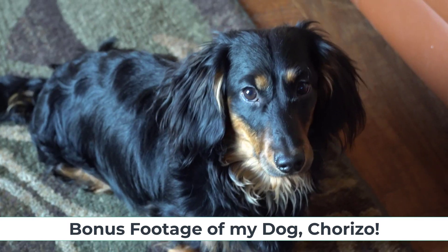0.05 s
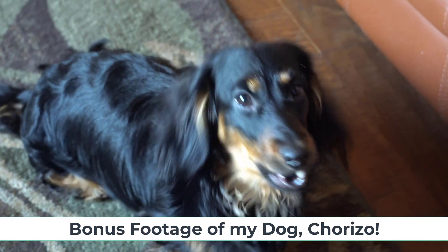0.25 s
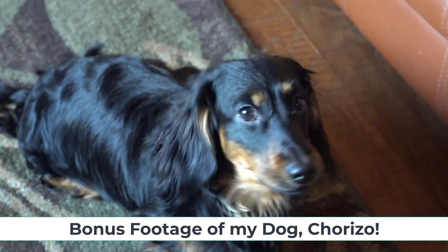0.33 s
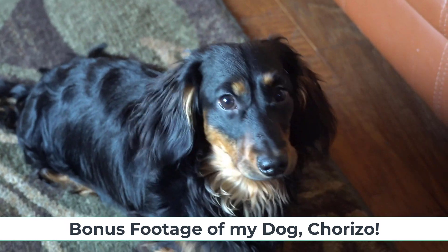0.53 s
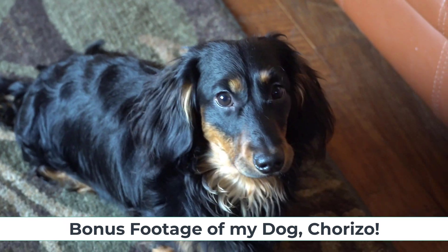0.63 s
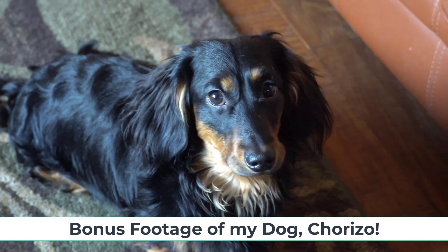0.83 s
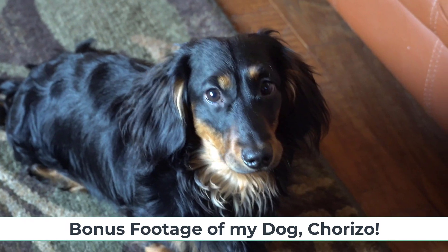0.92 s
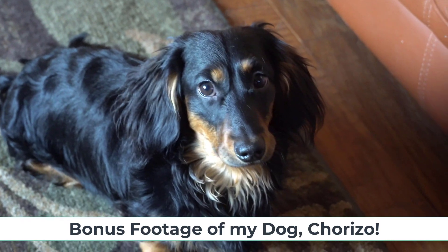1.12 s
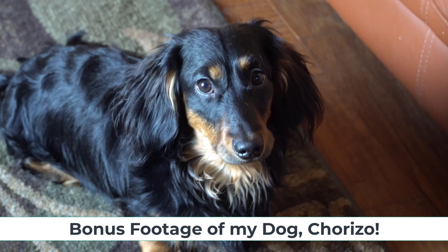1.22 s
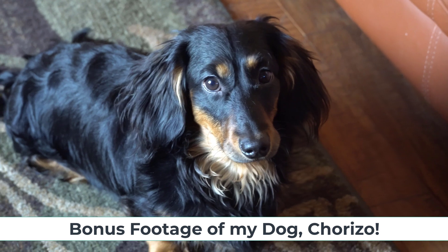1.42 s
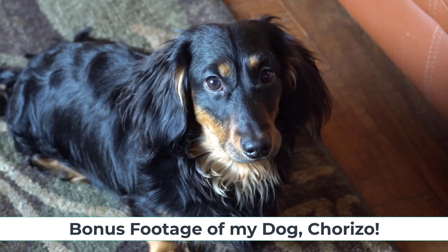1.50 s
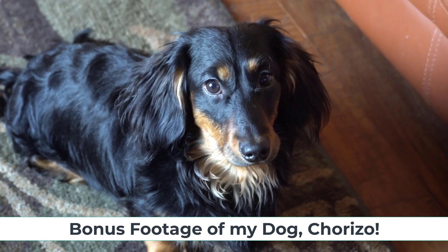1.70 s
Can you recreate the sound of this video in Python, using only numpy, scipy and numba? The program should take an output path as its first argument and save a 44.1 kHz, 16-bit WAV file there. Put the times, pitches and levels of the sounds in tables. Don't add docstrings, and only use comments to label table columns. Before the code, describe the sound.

Single abrupt, high bark from a small dog indoors, its pitch ringing briefly off hard walls.

```python
import sys
import numpy as np
from scipy import signal
from scipy.fft import rfft, irfft
from scipy.io import wavfile
from scipy.ndimage import uniform_filter1d
from numba import njit

SR = 44100
rng = np.random.default_rng(int(sys.argv[2]) if len(sys.argv) > 2 else 0)


def field_ratio(decibels):
    return 10 ** (np.asarray(decibels, dtype=float) / 20)


def wav_record(signal):
    frames = np.transpose(np.atleast_2d(signal))
    bounded = np.clip(frames, -1, 1)
    quanta = np.round(bounded * 32767).astype(np.int16)
    wavfile.write(sys.argv[1], SR, quanta)


N = 77175

# start_s, pitch_hz, level_db, odd_multiples_db, breath_db, jaw_opening (0-1)
BARK_COURSE = [
    (0.131, 105.2, -71, -0.5, -14.5, 0.02),
    (0.161, 115.7, -41.5, -2, -19, 0),
    (.205, 190, -25, 0, -17, .14),
    (.222, 266, -8, -3, -21, .5),
    (.252, 340, 2, -9, -23, .55),
    (0.277, 369.2, 2.5, -31.5, -29, 1.),
    (.318, 365.5, 1, -30, -33.5, 0.9),
    (0.345, 336.8, -2.5, -36.5, -31.5, 1),
    (0.371, 329, -50.5, -26.5, -30.5, 0.9),
]
# frequency_hz, level_db
JAWS_SHUT = [(100, 1.5), (220, 0.5), (450, -7.5), (800, -15), (1050, -28.5), (1250, -28.5), (1700, -35),
             (5000, -53)]
# frequency_hz, level_db
JAWS_HALF = [(250, -18), (480, -3), (800, 0), (1300, -21), (2350, -21), (3200, -26), (4000, -46),
             (9000, -54)]
# frequency_hz, level_db
JAWS_OPEN = [(300, -24), (730, 4), (1400, -8.5), (2200, -11), (3600, -26.5), (4400, -23.5), (5200, -44),
             (9000, -53)]
# frequency_hz, level_db
ODD_COLOUR = [(250, -4), (380, -2), (900, 2), (1650, 6), (2350, 12), (3200, 4), (4700, 8), (9000, 2)]
# frequency_hz, level_db
BREATH_OPEN = [(300, -7), (2300, -15.5), (3300, -11.5), (4500, -11), (5700, -23.5), (7800, -1),
               (9800, -5.5), (15000, -36)]
# frequency_hz, level_db
BREATH_SHUT = [(600, -29), (1900, -20), (2800, -3), (3700, -21), (4600, 0.5), (6000, -12), (8000, -4),
               (10500, -7), (12500, -37)]
# frequency_hz, level_db
PUFF_COLOUR = [(20, -3), (40, 0), (90, -9), (200, -12), (380, -16), (600, -50)]
# frequency_hz, level_db, t60_s
ROOM_DECAY = [(148.5, -14, 0.45), (400, 0, 0.27), (757.7, -3, 0.54), (1400, 6, 0.51), (2200, 4.5, 0.45),
              (4300, -0.5, 0.39), (8000, -11, 0.78), (14000, -16.5, 0.22)]
# start_s, pitch_hz, peak_db, t60_s
IMPACTS = [
    (.0218, 840, -46.5, .012),
    (.094, 89, -62.5, 0.18),
    (.955, 98.45, -51.5, .15),
    (1.388, 644, -60.5, .03),
    (1.53, 105.3, -53.5, .15),
]
# frequency_hz, density_db (dB per Hz)
BACKGROUND = [(20, -6), (60, -3.5), (190, -2.5), (450, -8.5), (780, -9.5), (1300, -20), (3000, -25),
              (15000, -29)]

TOP_HZ = 15300
DUCK_DB, DUCK_AT_S, RECOVER_S = -4.5, 0.2, 8.0


def read(table, hz, col=1):
    a = np.array(table, float)
    return np.interp(np.log(np.maximum(hz, 1)), np.log(a[:, 0]), a[:, col])


def noise(table):
    gain = field_ratio(read(table, np.fft.rfftfreq(N, 1 / SR)))
    x = irfft(rfft(rng.standard_normal(N)) * gain, N)
    return x / x.std()


def walk(rate):
    k = int(SR / rate)
    held = np.repeat(rng.standard_normal(N // k + 1), k)
    return 1.5 * uniform_filter1d(uniform_filter1d(held, k), k)[:N]


def bands(count=20):
    half_octaves = np.log2(np.maximum(np.fft.rfftfreq(N, 1 / SR), 1) / 25) * 2
    spec = rfft(rng.standard_normal(N))
    return [(25 * 2 ** (k / 2), irfft(spec * np.clip(1 - abs(half_octaves - k), 0, 1), N))
            for k in range(count)]


@njit
def follow(x, up, down):
    e, y = 1e-9, np.empty(len(x))
    for i in range(len(x)):
        e += (abs(x[i]) - e) * (up if abs(x[i]) > e else down)
        y[i] = e
    return y


def bark():
    t, rows = np.arange(N) / SR, np.array(BARK_COURSE, float)
    tracks = [np.interp(t, rows[:, 0], rows[:, c]) for c in range(1, 6)]
    hz, db, odd_db, air_db, jaw = (uniform_filter1d(track, size=300) for track in tracks)
    jaw = np.clip(jaw, 0, 1)
    on = slice(int(rows[0, 0] * SR), int(rows[-1, 0] * SR))
    rough = field_ratio(np.minimum(odd_db, 0) / 2)
    jitter = 0.03 * rough ** 2 * walk(150)
    phase = 2 * np.pi * np.cumsum(hz * (1 + jitter)) / SR

    voice = np.zeros(N)
    voice[on] = multiples(hz[on], odd_db[on], jaw[on], rough[on], phase[on], on)
    voice[on] += breath(air_db, jaw, rough, phase)[on]
    shimmer_db = 1.5 * rough ** 2 * walk(120)
    wind = puff(db) * (voice != 0)
    return np.sqrt(2) * voice * field_ratio(db + shimmer_db), wind


def multiples(hz, odd_db, jaw, rough, phase, on):
    waver_db, drift_rad, waver_rate_hz = 4.0, 0.12, 180
    lip_hz, lip_db_oct = 9000, -25
    shut, wide = np.clip(1 - 2 * jaw, 0, 1), np.clip(2 * jaw - 1, 0, 1)
    size_walk, lag_walk = walk(waver_rate_hz), walk(waver_rate_hz)
    out = 0
    for k, (start, shift) in enumerate(rng.random((44, 2)), 1):
        f, own = k * hz, int(shift * N)
        g = shut * read(JAWS_SHUT, f) + (1 - shut - wide) * read(JAWS_HALF, f) + wide * read(JAWS_OPEN, f)
        g = g + (k % 2) * (odd_db + (1 - shut) * read(ODD_COLOUR, f))
        g = g + waver_db * min(k / 5, 1) * rough * np.roll(size_walk, own)[on]
        g = g + lip_db_oct * np.log2(np.maximum(f / lip_hz, 1))
        drift = drift_rad * k * (rough + 0.05) * np.roll(lag_walk, own)[on]
        lag = min(k / 6, 1) * 6 * start + drift
        out = out + field_ratio(g) * (f < TOP_HZ) * np.cos(k * phase + lag)
    return out


def breath(air_db, jaw, rough, phase):
    gate = np.exp(1.6 * rough * (np.cos(phase) - 1))
    hiss = np.clip(1 - 2 * jaw, 0, 1) * field_ratio(3 * walk(120)) * noise(BREATH_SHUT)
    return field_ratio(air_db) * gate * (hiss + jaw * noise(BREATH_OPEN))


def puff(level_db):
    return field_ratio(-40) * noise(PUFF_COLOUR) * field_ratio(level_db - level_db.max())


def room(x):
    first_wall_s, build_s, level_db = 0.008, 0.03, -7
    far_wall_s, far_spread_s, far_wall_db = 0.06, 0.014, 6
    late_db, late_stretch = -15, 1.9
    t = np.maximum(np.arange(N) / SR - first_wall_s, 0)
    tail = 0
    for hz, band in bands():
        t60 = read(ROOM_DECAY, hz, col=2)
        fade = field_ratio(-60 * t / t60) + field_ratio(late_db - 60 * t / (t60 * late_stretch))
        tail = tail + field_ratio(read(ROOM_DECAY, hz)) * fade * band
    far_wall = field_ratio(far_wall_db * np.exp(-((t - far_wall_s) / far_spread_s) ** 2))
    tail = tail * (1 - np.exp(-t / build_s)) * far_wall * field_ratio(level_db) / np.sqrt(0.15 * SR)
    return signal.fftconvolve(x, tail)[:N]


def tag():
    start_s, rise_s, pitch_hz, level_db, t60_s = 0.305, 0.04, 6200, -47, 0.55
    t = np.maximum(np.arange(N) / SR - start_s, 0)
    decay_db = -60 * np.maximum(t - rise_s, 0) / t60_s
    swell = np.minimum(t / rise_s, 1) * field_ratio(level_db + decay_db + 2.9 * walk(89))
    return swell * np.sin(2 * np.pi * np.cumsum(pitch_hz * (1 + 0.012 * walk(300))) / SR)


def knocks():
    out = 0
    for start_s, pitch_hz, peak_db, t60_s in IMPACTS:
        t = np.maximum(np.arange(N) / SR - start_s, 0)
        onset = 1 - np.exp(-t * pitch_hz * 3)
        out = out + field_ratio(peak_db - 60 * t / t60_s) * np.sin(2 * np.pi * pitch_hz * t) * onset
    return out


def hush():
    level_db, flicker_db, hum_hz, hum_db = -70, 2.76, 99.4, -76.5
    x = 0
    for hz, band in bands():
        waver_db = flicker_db * min(1, 1500 / hz) * walk(3)
        x = x + field_ratio(read(BACKGROUND, hz) + waver_db) * band
    hum_phase = 2 * np.pi * np.cumsum(hum_hz * (1 + 0.02 * walk(7.5))) / SR
    hum = field_ratio(hum_db + walk(11)) * np.sin(hum_phase)
    return x / x.std() * field_ratio(level_db) + hum


def scene():
    voice, wind = bark()
    background = field_ratio(-DUCK_DB) * (hush() + knocks())
    return (voice + room(voice) + tag() + wind + background)[None]


def band_limit(x):
    return signal.sosfilt(signal.butter(12, 15460, fs=SR, output="sos"), x)


def record(dry):
    attack_s, release_s, limit_db, ratio = 0.001, 0.0083, -9, 4
    t = np.arange(N) / SR
    level = follow(dry[0], 1 / (attack_s * SR), 1 / (release_s * SR))
    quick = np.minimum(1, field_ratio(limit_db) / level) ** (1 - 1 / ratio)
    since = t - DUCK_AT_S
    slow_db = DUCK_DB * np.clip(since / 0.015, 0, 1) * np.exp(-np.maximum(since, 0) / RECOVER_S)
    top_cut = signal.ellip(8, 0.2, 70, TOP_HZ, fs=SR, output="sos")
    mix = signal.sosfilt(top_cut, dry * quick * field_ratio(slow_db))
    return band_limit(mix)


dry = scene()
out = record(dry)
wav_record(out)
```